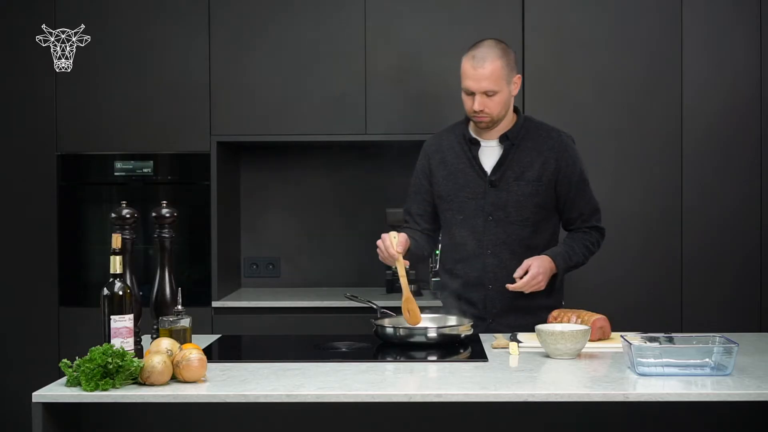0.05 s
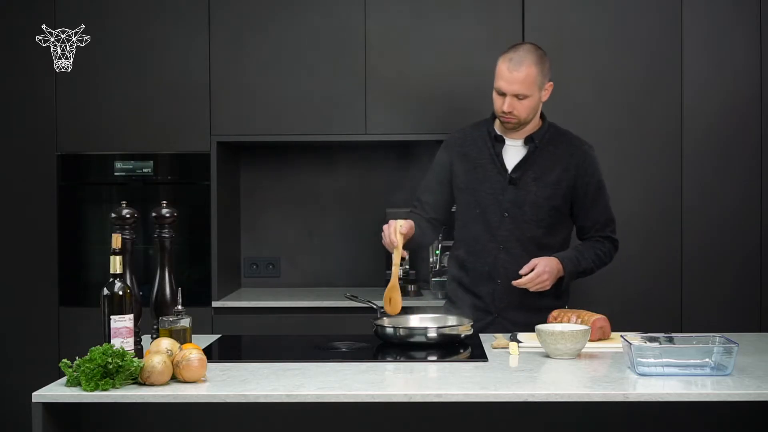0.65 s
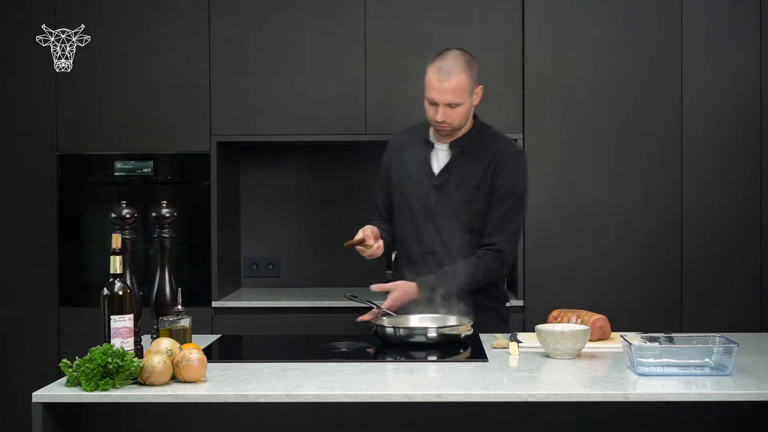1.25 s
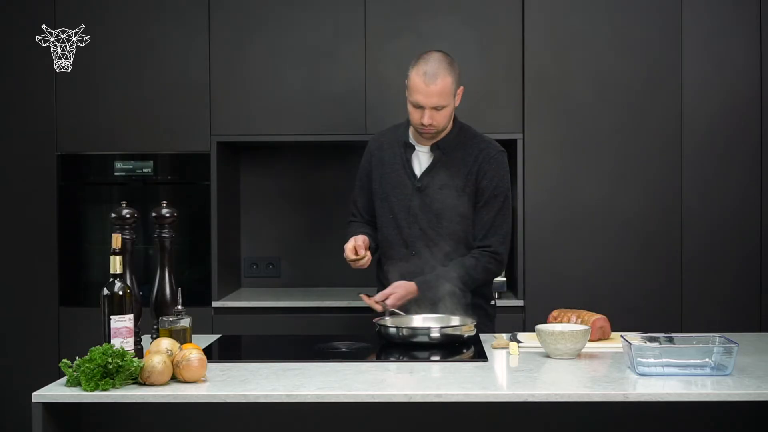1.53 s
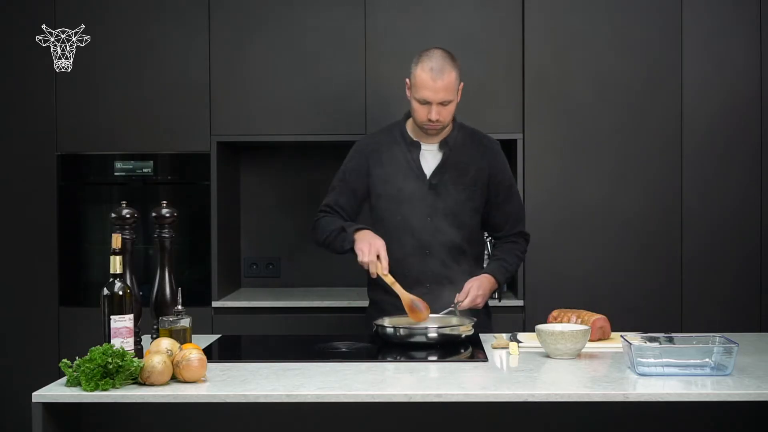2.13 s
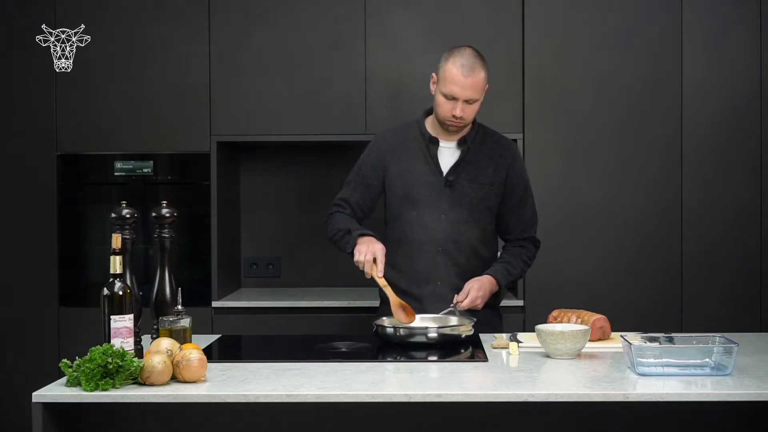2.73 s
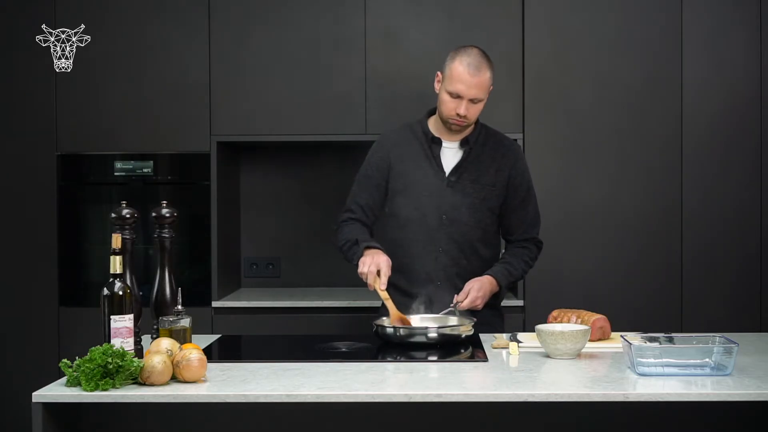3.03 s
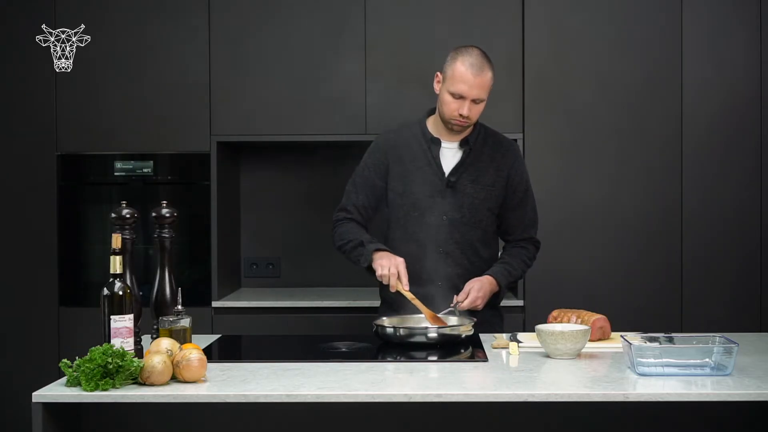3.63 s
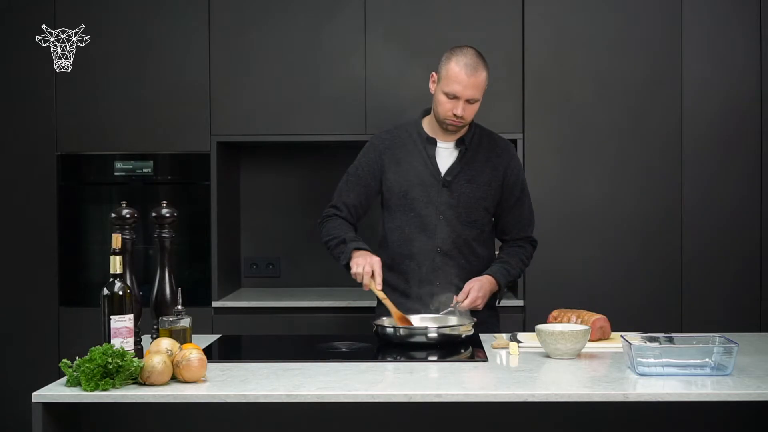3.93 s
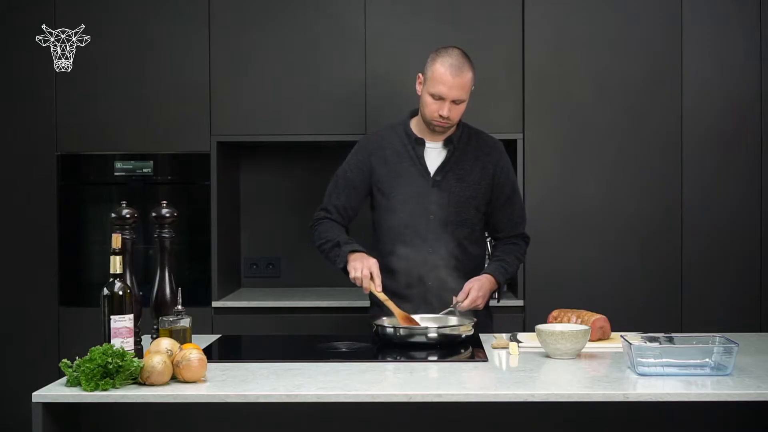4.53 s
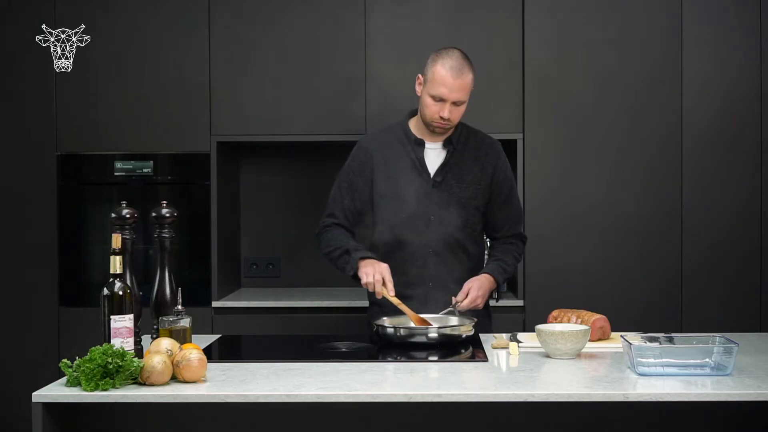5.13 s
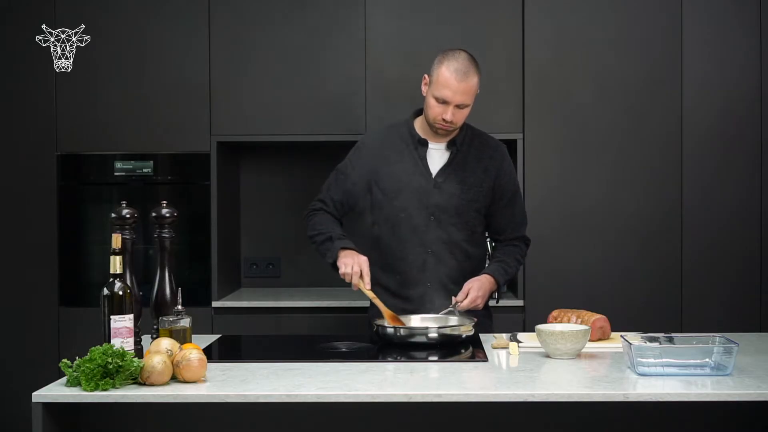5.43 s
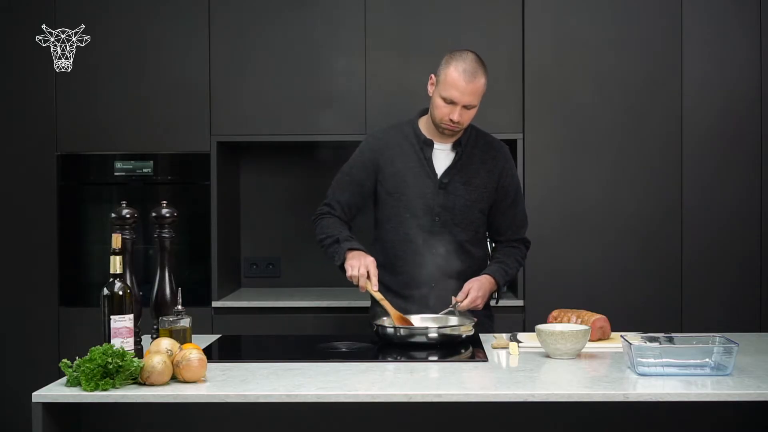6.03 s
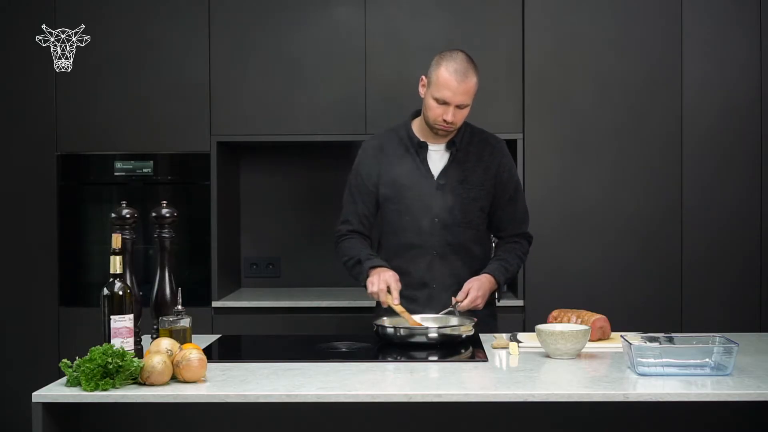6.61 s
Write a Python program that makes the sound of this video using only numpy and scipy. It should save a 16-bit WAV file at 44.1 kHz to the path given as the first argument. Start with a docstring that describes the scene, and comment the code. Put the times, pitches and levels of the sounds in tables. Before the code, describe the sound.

A bright, crackling sizzle of butter frying in a quiet kitchen surges now and then as a wooden spoon gently rubs the pan.

```python
"""A bright, crackling sizzle: butter in a hot steel pan in a quiet kitchen.
Thousands of tiny steam bubbles burst each second, flaring when the butter meets hot metal; now and
then a larger drop spits. Butter sliding in the tilted pan, then a wooden spoon, rub softly and ring
the steel; hand and spoon bump it dully. Underneath lie room air, the hob's hum and a faint tone."""
import sys
import numpy as np
from scipy import signal
from scipy.fft import rfft, irfft, next_fast_len
from scipy.io import wavfile

SR = 44100
rng = np.random.default_rng(int(sys.argv[2]) if len(sys.argv) > 2 else 0)


def put_to_file(sound):
    """Save the sound as 16-bit audio at rate SR, in the file named by the first command-line argument."""
    columns = np.atleast_2d(sound).T  # one column per channel
    safe = np.clip(columns, -1, 1)
    whole_steps = np.round(safe * 32767)
    wavfile.write(sys.argv[1], SR, whole_steps.astype(np.int16))


N = 302998
TIME = np.arange(N) / SR


def amp(db):
    """Decibels to gain."""
    return 10 ** (np.asarray(db) / 20)


def unit(x):
    """Scales to an rms of one."""
    return x / np.sqrt(np.mean(x ** 2) + 1e-20)


def curve_db(points, hz):
    """Reads an EQ curve in dB, its points joined on a log-frequency axis."""
    freqs, db = np.transpose(points)
    return np.interp(np.log(hz + 1), np.log(freqs + 1), db)


def colour(x, points):
    """Filters x through an EQ curve."""
    size = next_fast_len(len(x), True)
    gain = amp(curve_db(points, np.fft.rfftfreq(size, 1 / SR)))
    return irfft(rfft(x, size) * gain, size)[:len(x)]


def drift(hz):
    """A random wobble with an rms of one, moving at up to about hz."""
    knots = rng.standard_normal(1024)
    return unit(np.interp(2 * hz * TIME, np.arange(len(knots)), knots))


def add(mix, start, sound):
    """Mixes a sound in at start seconds."""
    part = mix[max(round(start * SR), 0):][:len(sound)]
    part += sound[:len(part)]


def clicks(per_s, spread_db):
    """Random impulses: many small, a few large."""
    when, chance, side = rng.random((int(per_s * N / SR), 3)).T
    size = amp(spread_db * -np.log(chance + np.exp(-6)))  # exp(-6) caps the largest
    return np.bincount((when * N).astype(int), size * np.sign(side - .5), N)


def pop(hz, cycles):
    """One burst: its envelope swells to one after the given cycles, then dies."""
    turns = np.arange(int(10 * cycles * SR / hz) + 2) * hz / SR
    return turns / cycles * np.exp(1 - turns / cycles) * np.sin(2 * np.pi * turns)


def kitchen_reverb(x, wet_db, t60):
    """The room smears dense clicks into a hiss that follows their power and dies away."""
    decay = np.exp(-np.log(1e6) / (t60 * SR))
    envelope = np.sqrt(signal.lfilter([1 - decay], [1, -decay], x ** 2))
    return unit(x + amp(wet_db) * envelope * rng.standard_normal(N))


def sweep_speed(start, length):
    """A sweeping motion: speeds up, slows down and stops."""
    return np.sin(np.pi * np.clip((TIME - start) / length, 0, 1))


def whine(hz, db, waver_rad=0.31, flutter_db=0.0):
    """A tone that wavers a little in pitch and can flutter in level."""
    phase = 2 * np.pi * (hz * TIME + rng.random()) + waver_rad * drift(hz=3.3)
    return amp(db + flutter_db * drift(hz=6.2)) * np.sqrt(2) * np.sin(phase)


# EQ of the room tone: (frequency [Hz], relative level [dB])
AIR_EQ = [(20, -40), (50, -21), (85, -13), (150, -7), (220, -4), (350, 0), (480, -1.5), (660, -3.5),
          (900, -7.5), (1300, -5), (2000, -12), (5000, -17.5)]


def room_air(level_db=-57.5):
    """The kitchen's steady air: a soft bed of low-mid noise."""
    return amp(level_db) * unit(colour(rng.standard_normal(N), AIR_EQ))


# partials of the hob's hum: (frequency [Hz], rms level [dB])
HUM_PARTIALS = [(100, -77.5), (131.5, -80), (200, -80.5), (331, -78.5)]


def hob_hum():
    """The hob hums on a few low, wavering partials."""
    return sum(whine(hz, db) for hz, db in HUM_PARTIALS)


def faint_tone(hz=431, level_db=-71.5, start_s=0.12, rise_s=.02, hold_s=.95, fade_db_per_s=10):
    """A fluttering tone sets in around the first bump, holds and dies away."""
    age = TIME - start_s
    db = level_db - fade_db_per_s * np.maximum(age - hold_s, 0)
    return np.clip(age / rise_s, 0, 1) * whine(hz, db, waver_rad=1.0, flutter_db=3)


# thud cues: (time [s], level [dB], pitch [Hz])
THUD_CUES = [(1.134, -65.5, 85), (1.757, -70, 91)]


def thuds():
    """Soft thuds, each a single low push."""
    out = np.zeros(N)
    for start, db, hz in THUD_CUES:
        add(out, start, amp(db) * pop(hz, cycles=.6))
    return out


# swish cues: (time [s], length [s], level [dB], band centre [Hz])
SWISH_CUES = [(0.738, 0.39, -57.5, 1240), (5.0, 0.56, -61.5, 750)]


def swishes(half_width_octaves=0.46):
    """Soft, broad friction that swells and fades with the arm's speed."""
    out = np.zeros(N)
    for start, length, db, hz in SWISH_CUES:
        edges = hz * 2. ** np.array([-half_width_octaves, half_width_octaves])
        band = signal.butter(2, edges, "bandpass", fs=SR, output="sos")
        friction = unit(signal.sosfilt(band, rng.standard_normal(N)))
        out += amp(db) * sweep_speed(start, length) * friction
    return out


# bumps on the pan: (time [s], level [dB], tail t60 [s], knock pitch [Hz])
BUMP_CUES = [(0.173, -51.5, .35, 420), (1.076, -56, .2, 340), (1.429, -44, 0.45, 330),
             (1.462, -48, .25, 300), (1.486, -43, 0.38, 350), (1.517, -51.5, .45, 300),
             (3.67, -51, 0.39, 340), (3.70, -50, .35, 370)]
# EQ of their dull body: (frequency [Hz], relative level [dB])
BUMP_EQ = [(50, -38), (100, -19), (160, -6), (260, -3), (330, 1.5), (420, -6), (680, -5.5), (1100, -11),
           (1650, -18), (2500, -35)]


def bumps(attack_s=0.0008, blow_s=0.0033, tail_db=-8):
    """Hand and spoon bump the pan: a short dull knock, then a weaker tail in the room."""
    out, t = np.zeros(N), np.arange(SR // 2) / SR
    for start, db, t60, hz in BUMP_CUES:
        attack = 1 - np.exp(-t / attack_s)
        fade = np.exp(-t / blow_s) + amp(tail_db) * np.exp(-np.log(1000) * t / t60)
        body = unit(colour(rng.standard_normal(len(t)), BUMP_EQ))
        add(out, start, amp(db) * body * attack * fade)
        add(out, start, amp(db) * pop(hz, cycles=0.76))
    return out


# rubs over the pan floor: butter sliding in the tilted pan, then spoon strokes
# (time [s], length [s], level [dB], brightness [0-1])
RUB_CUES = [(1.15, 1.3, -52, .9), (2.098, 1.6, -55.2, .38), (3.268, 0.49, -54, 0.76), (3.5, 0.7, -55, 0.26),
            (4.15, 1.02, -57.5, 0.4), (4.94, 0.3, -51, 0.76), (5.0, 0.61, -52.5, 0.74),
            (5.92, .38, -61, 0.1), (6.42, 0.38, -61, .25), (6.7, 0.23, -53.5, 0.7)]


def rub_contact(idle_db=-66, idle_brightness=.7):
    """Gain and brightness follow each rub's speed; in between, the simmer rings the pan."""
    power = amp(idle_db) ** 2
    bright_power = idle_brightness * power
    for start, length, db, brightness in RUB_CUES:
        rub_power = (amp(db) * sweep_speed(start, length)) ** 2
        power += rub_power
        bright_power += brightness * rub_power
    return np.sqrt(power), bright_power / power


# ring of the rubbed pan: (frequency [Hz], width [Hz], relative level [dB])
STEEL_MODES = [(587, 22, -16), (634, 21, -19), (678, 30, -16.5), (850, 260, -12), (1170, 75, -7),
               (1295, 40, -5), (1510, 200, -5.5), (1616, 50, -2), (1730, 310, -3.5), (2270, 140, -5),
               (2413, 120, -4.5), (2616, 124, -3), (2774, 140, -6.5), (3325, 180, -3.5)]


def pan_rub(tilt_db=13, pivot_hz=1900, unsteady_db=0.97):
    """Tiny slips on buttered steel ring the pan; a sharper contact favours the higher modes."""
    envelope, brightness = rub_contact()
    slips = kitchen_reverb(clicks(per_s=5000, spread_db=2.0), wet_db=-1.5, t60=0.32)
    ring, power = np.zeros(N), np.zeros(N)
    for k, (hz, width, db) in enumerate(STEEL_MODES):
        b, a = signal.iirpeak(hz, hz / width, SR)
        gain = amp(db + tilt_db * (brightness - .5) * np.log2(hz / pivot_hz))
        # neighbouring modes swing in opposite senses at the point of contact
        ring += (-1) ** k * gain * unit(signal.lfilter(b, a, slips))
        power += gain ** 2
    return unit(ring / np.sqrt(power)) * envelope * amp(unsteady_db * drift(hz=12))


# single loud spits of fat: (time [s], level [dB], pitch [Hz])
SPIT_CUES = [(.0202, -23, 11000), (.2954, -24, 11000), (1.5448, -26, 9500), (2.1681, -25, 9500),
             (4.9117, -22, 10000), (5.549, -31, 4270), (5.883, -28, 10000), (6.333, -17, 10900)]


def spits(cycles=1.0):
    """Now and then a larger drop of water bursts out of the fat."""
    out = np.zeros(N)
    for peak_s, db, hz in SPIT_CUES:
        add(out, peak_s - cycles / hz, amp(db) * pop(hz, cycles))
    return out


def bubbles(per_s=18000, spread_db=2.7, cycles=0.66, sizes=14):
    """Bursting steam bubbles of many sizes; the small, high ones snap most unevenly."""
    out = np.zeros(N)
    for hz in np.linspace(1500, 16500, sizes):
        burst = pop(hz, cycles)
        train = unit(clicks(per_s / sizes, spread_db * (hz / 11000) ** .7))
        out += np.convolve(train, burst / np.linalg.norm(burst))[:N]
    return unit(out)


# flare cues: (time [s], time fed with butter [s], level over the simmer [dB], bubble pitch [Hz])
FLARE_CUES = [(-0.17, 0.25, 5.0, 17600.0), (0.18, 0.37, 4, 17000.0), (0.81, 0.05, 1, 10900.0),
              (0.99, 0.17, 4, 13000), (1.23, 0.59, -0.5, 8300), (1.74, 0.49, 1.5, 6860),
              (1.84, 0.12, 3, 10500), (2.54, 0.25, 8.5, 10300), (2.89, 0.05, 5, 11700.0),
              (3.13, 0.39, 2.5, 12600.0), (3.53, 0.13, 5.5, 6860), (3.78, 0.18, 5.5, 15500),
              (4.04, 0.22, 1.5, 14100.0), (4.41, 0.49, 0, 6800), (5.1, 0.088, 10.5, 12400.0),
              (5.93, 0.19, 3.8, 16500.0), (6.27, 0.49, 2.2, 16600.0)]


def flares(hz, t, rise_s=.17, boil_off_s=0.15, spread_octaves=.835):
    """Gain by pitch and time: wet butter meets hot steel, flares while it is fed and boils off."""
    power = np.ones((len(hz), len(t)))  # the steady simmer
    for start, fed_s, db, pitch in FLARE_CUES:
        age = t - start
        envelope = np.clip(age / rise_s, 0, 1) * np.exp(-np.maximum(age - fed_s, 0) / boil_off_s)
        band = np.exp(-.5 * (np.log2((hz + 1) / pitch) / spread_octaves) ** 2)
        power += amp(db) ** 2 * np.outer(band, envelope)
    return np.sqrt(power / power.mean(1, keepdims=True))  # each band keeps a mean power of one


# EQ of the sizzle: (frequency [Hz], relative level [dB])
SIZZLE_EQ = [(200, -29.5), (900, -20.5), (2000, -20.5), (3000, -15.6), (3950, -6.5), (5500, -5.5),
             (6100, -6), (6800, -4), (8900, -2), (9400, -2), (10500, -2), (12500, -2), (14300, -5),
             (15700, -5.5)]
# resonances of the open pan: (frequency [Hz], width [Hz], gain [dB])
PAN_RESONANCES = [(1254, 220, -0.5), (1730, 180, 3), (2460, 310, 2), (5530, 480, 1.5), (6720, 200, 2.5),
                  (7800, 240, 2), (9440, 160, 4), (10420, 410, 3), (11600, 400, 1.7)]


def sizzle(level_db=-35.0, sputter_db=0.46):
    """Bubbles burst in small flurries; the pan colours them and the flares make them surge."""
    crackle = bubbles() * amp(sputter_db * drift(hz=39.64))
    hz, t, spectrum = signal.stft(kitchen_reverb(crackle, wet_db=0.5, t60=0.23), SR, nperseg=1024)
    pan_db = sum(db / (1 + (2 * (hz - centre) / width) ** 2) for centre, width, db in PAN_RESONANCES)
    eq = unit(amp(curve_db(SIZZLE_EQ, hz) + pan_db))
    spectrum *= eq[:, None] * flares(hz, t)
    return amp(level_db) * signal.istft(spectrum, SR, nperseg=1024)[1][:N]


def scene():
    """Pan sounds over the kitchen bed, the same in both channels."""
    pan = sizzle() + spits() + pan_rub() + swishes() + bumps() + thuds()
    bed = hob_hum() + faint_tone() + room_air()
    return np.array([pan + bed] * 2)


def record(dry, cutoff_hz=15760):
    """A steep low-pass trims the very top of the sizzle."""
    lowpass = signal.firwin(1023, cutoff_hz, window=("kaiser", 9), fs=SR)
    return signal.oaconvolve(dry, lowpass[None], "same")


dry = scene()
out = record(dry)
put_to_file(out)
```